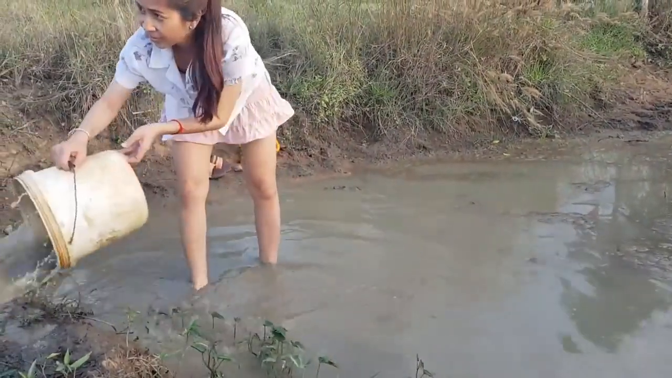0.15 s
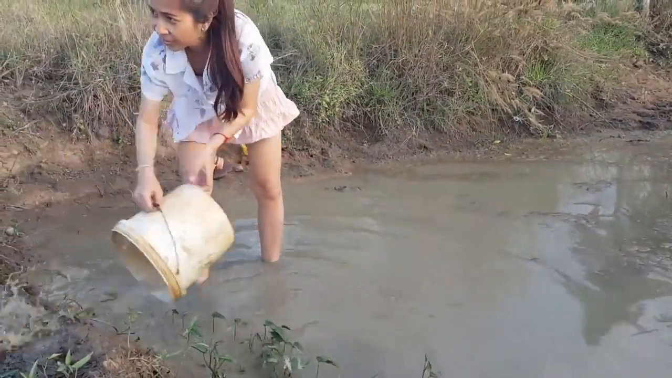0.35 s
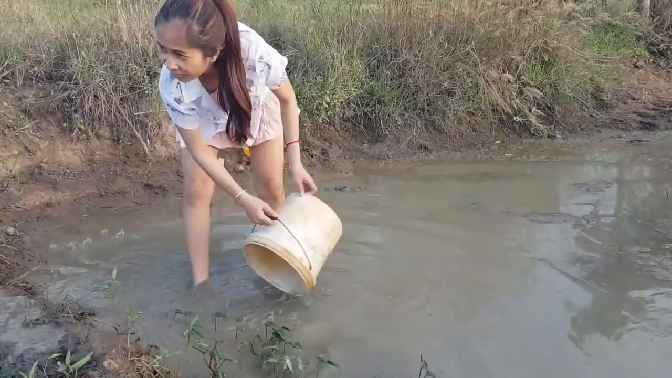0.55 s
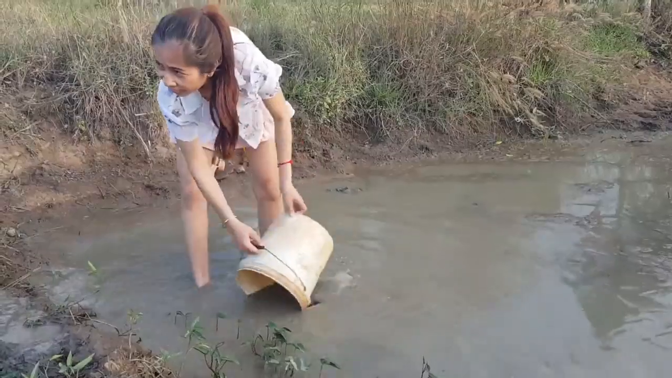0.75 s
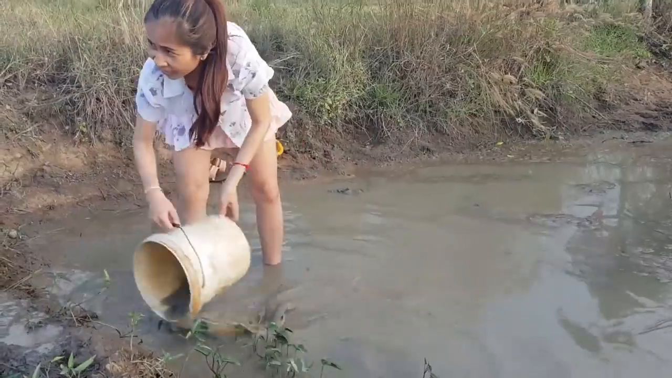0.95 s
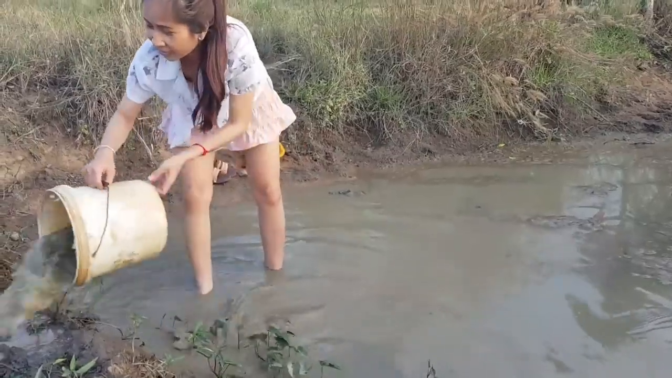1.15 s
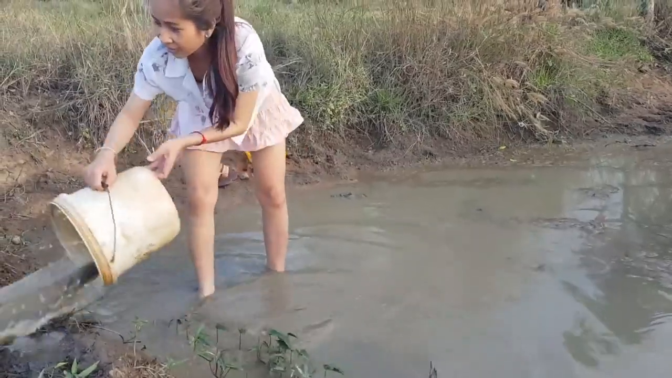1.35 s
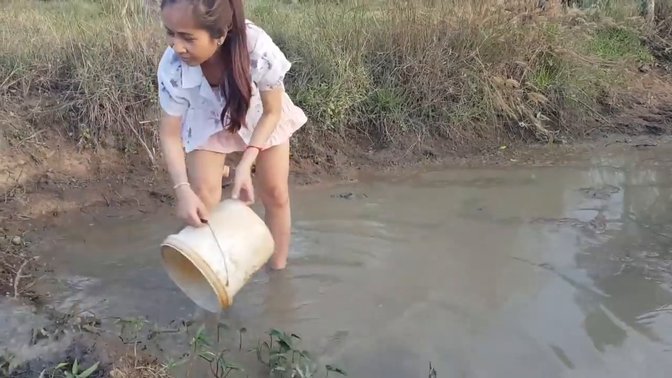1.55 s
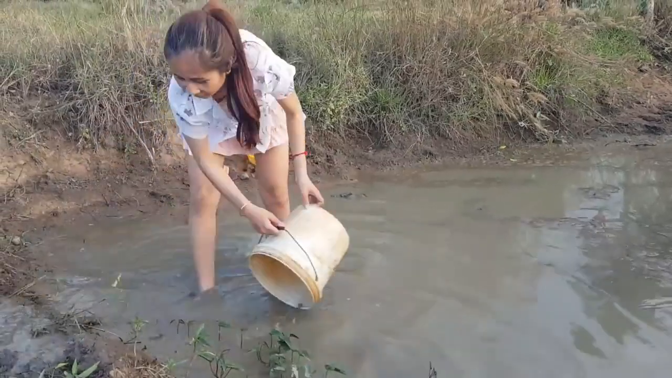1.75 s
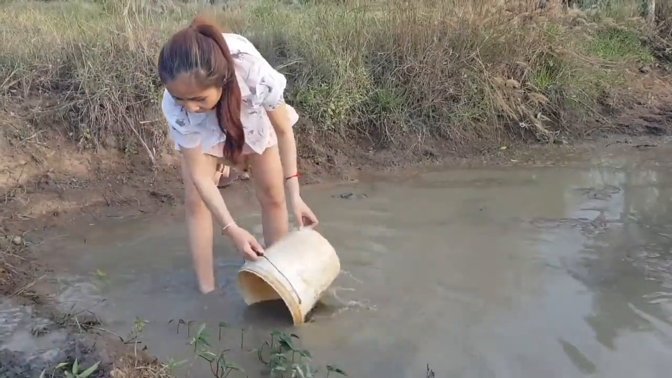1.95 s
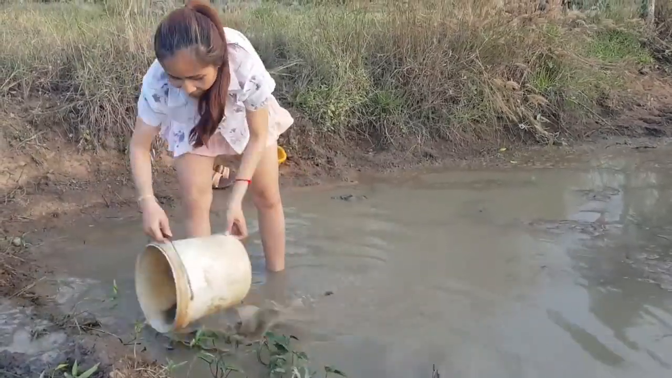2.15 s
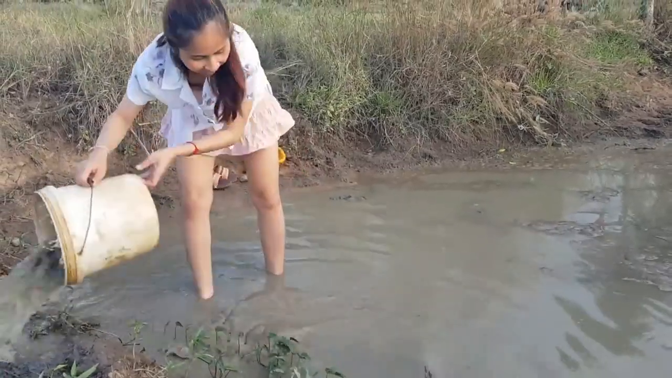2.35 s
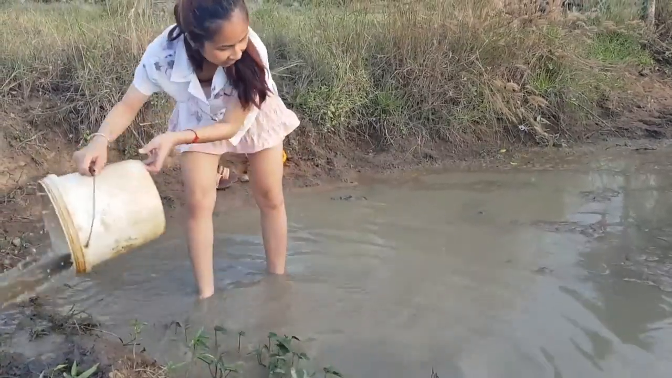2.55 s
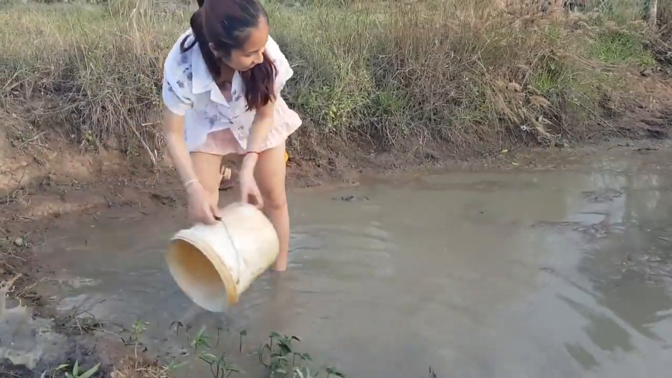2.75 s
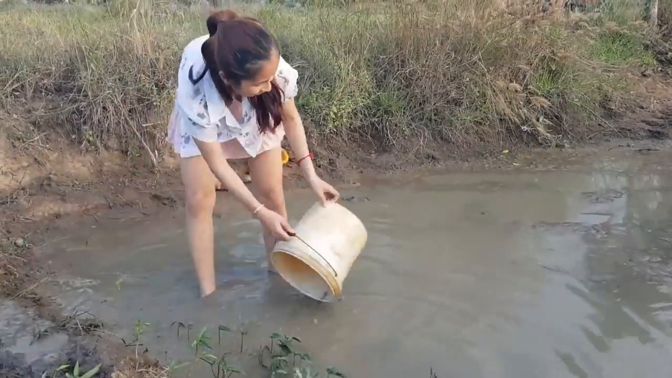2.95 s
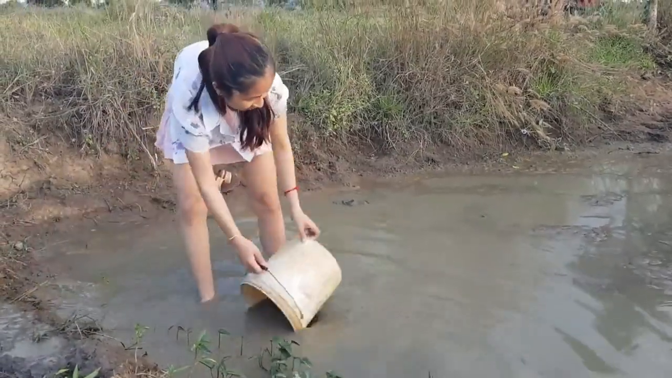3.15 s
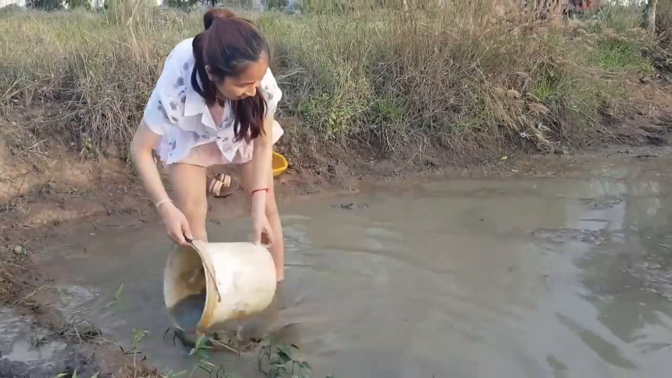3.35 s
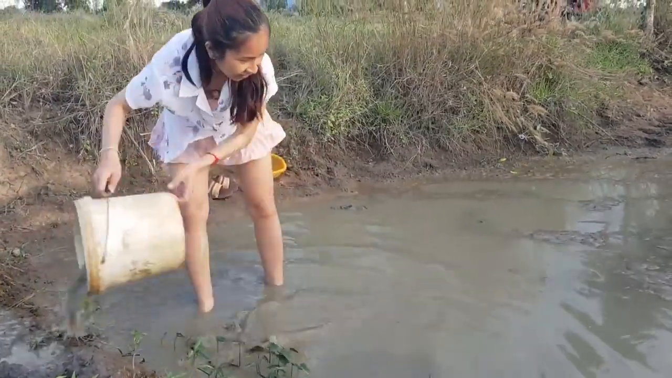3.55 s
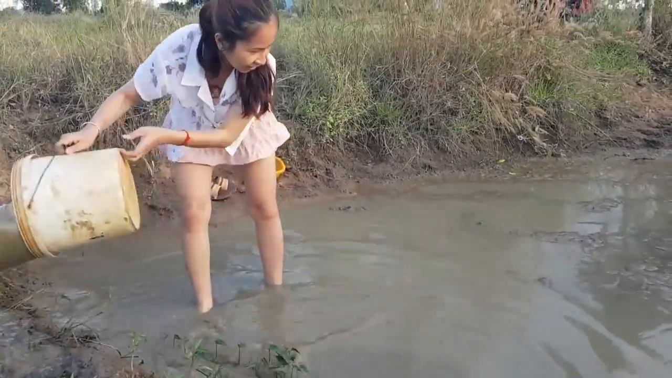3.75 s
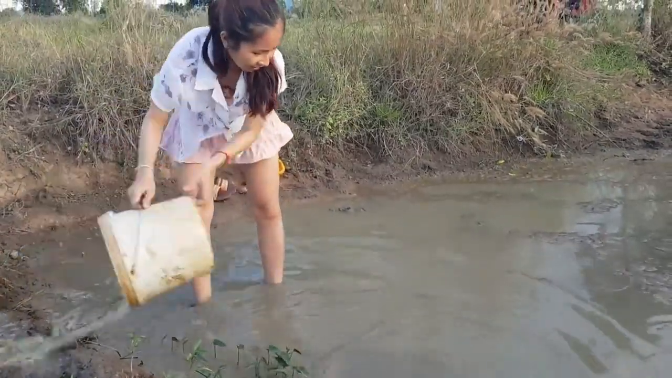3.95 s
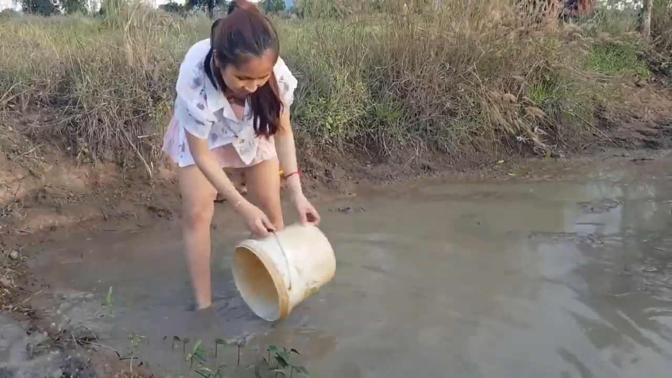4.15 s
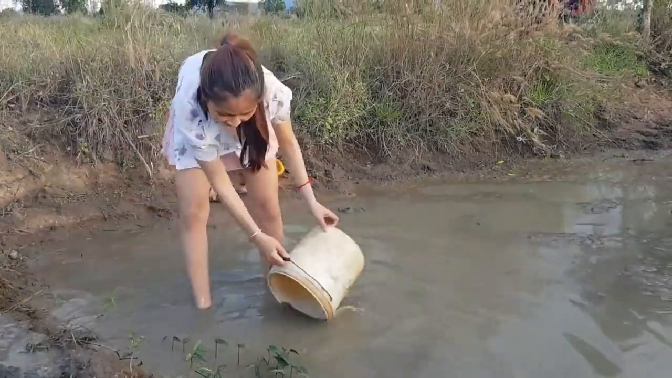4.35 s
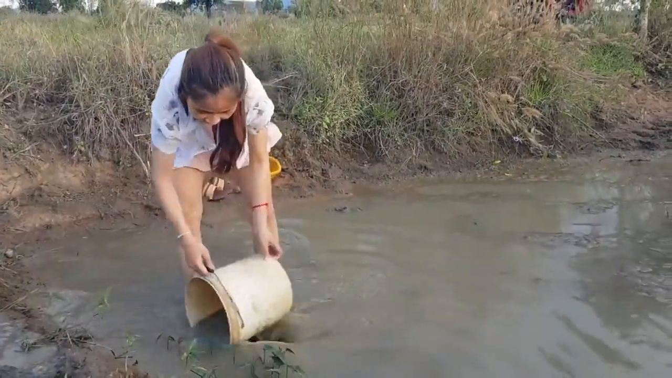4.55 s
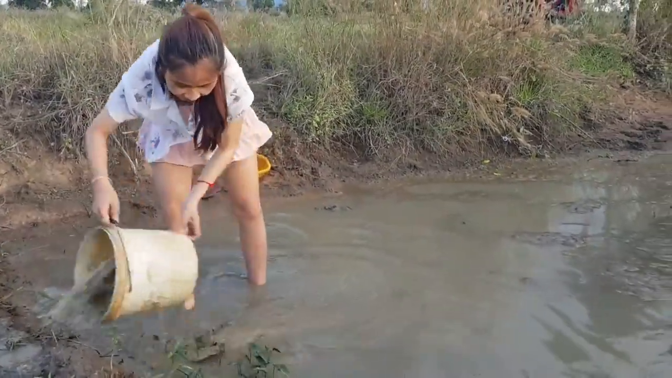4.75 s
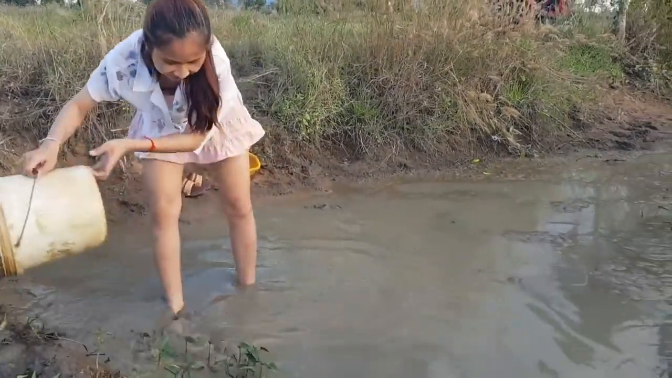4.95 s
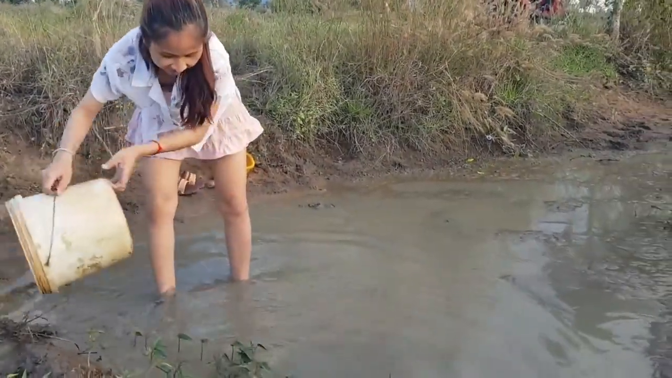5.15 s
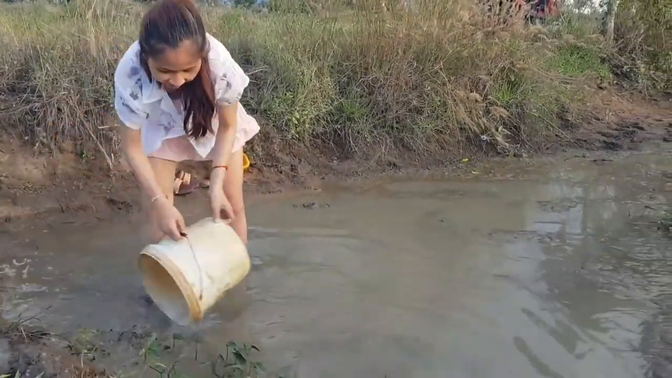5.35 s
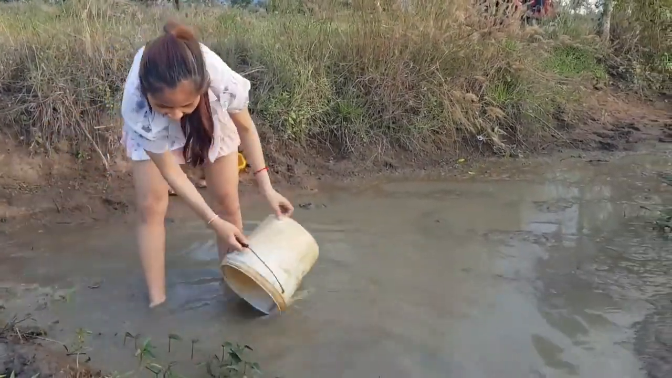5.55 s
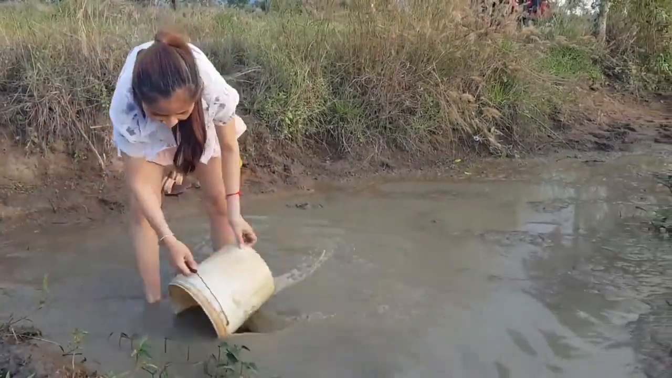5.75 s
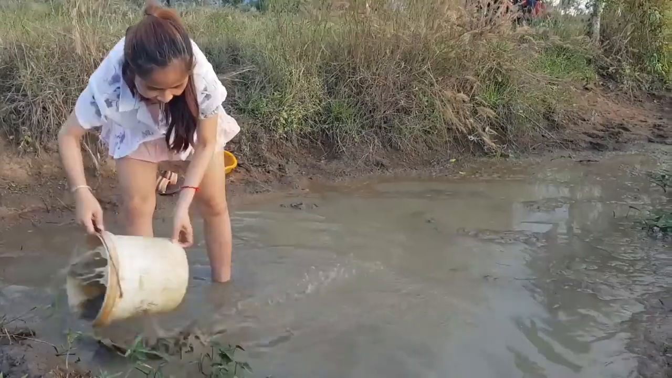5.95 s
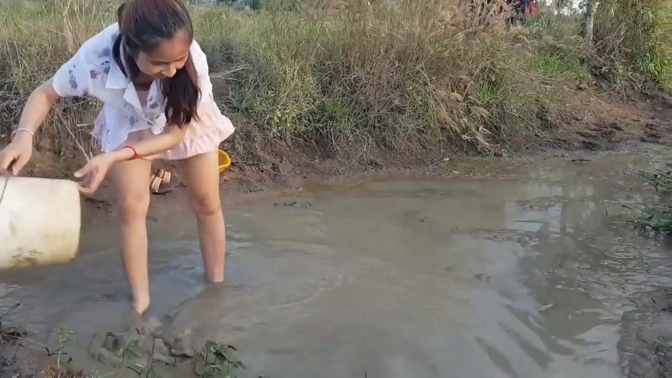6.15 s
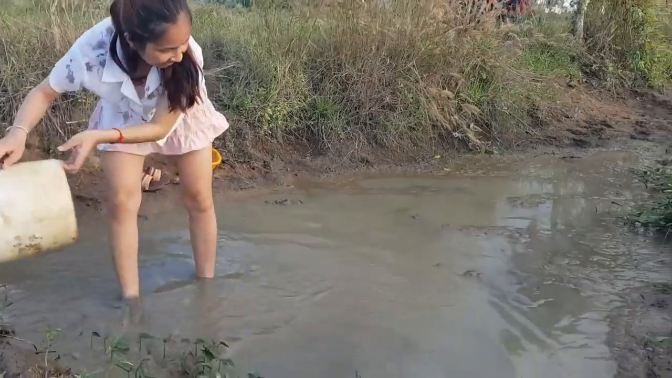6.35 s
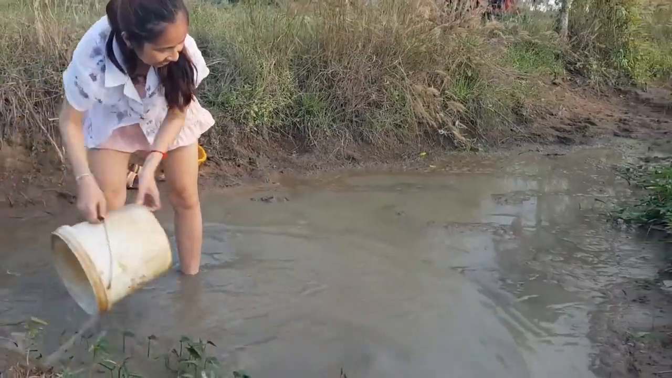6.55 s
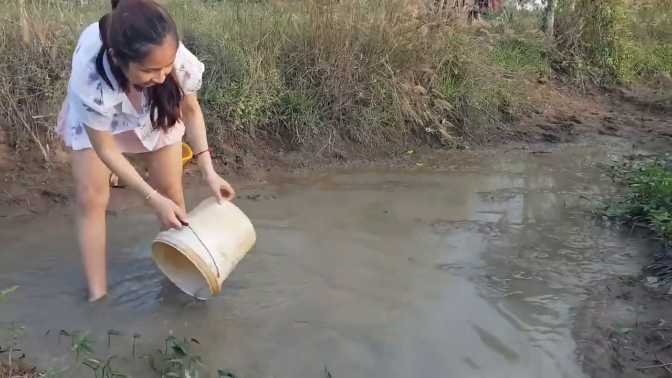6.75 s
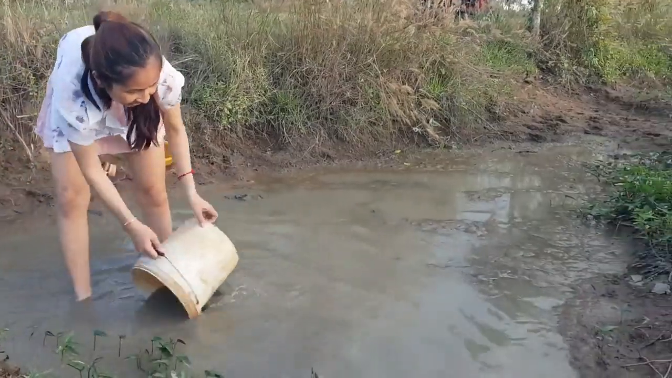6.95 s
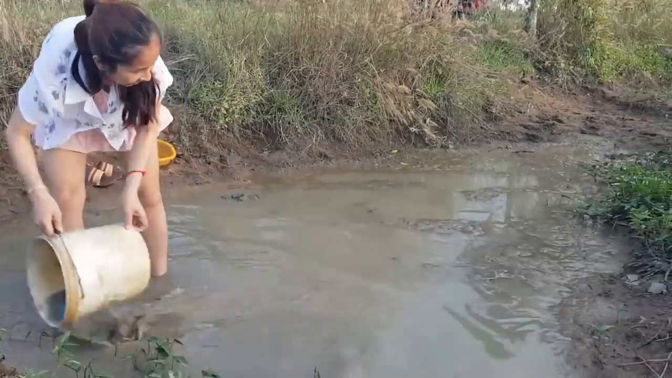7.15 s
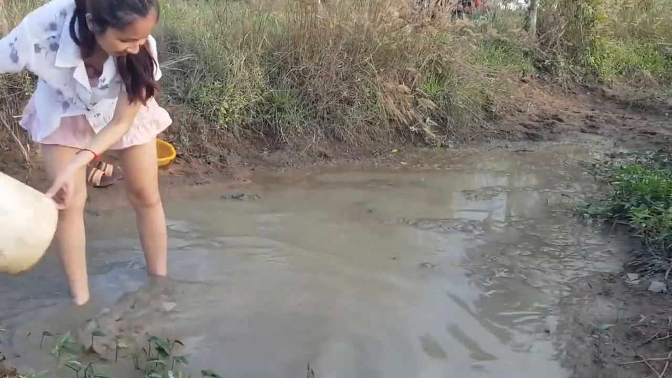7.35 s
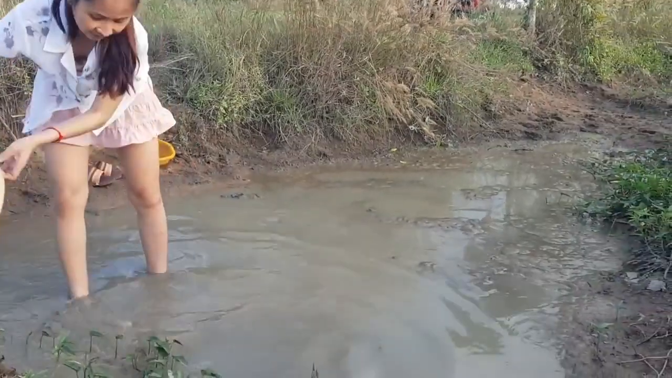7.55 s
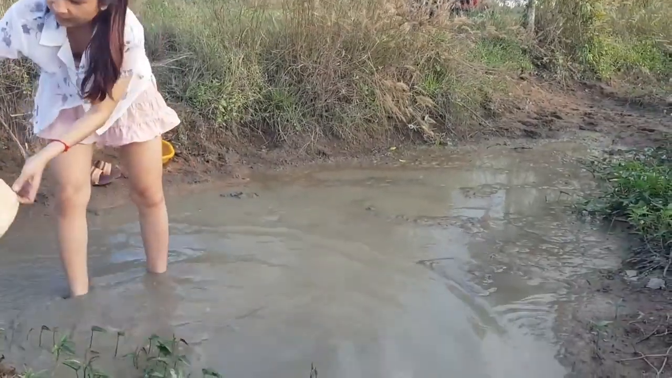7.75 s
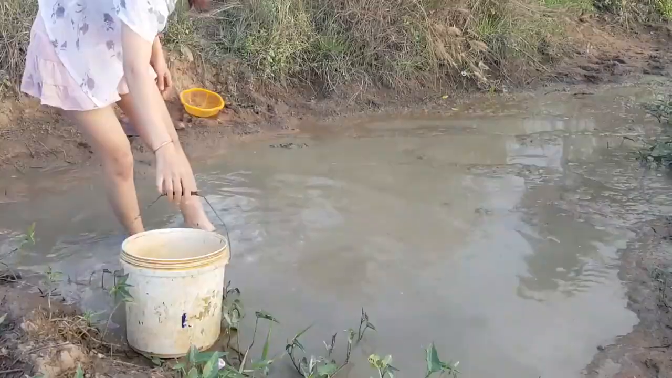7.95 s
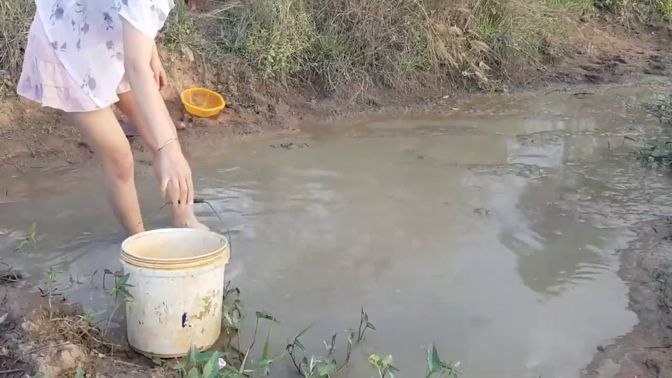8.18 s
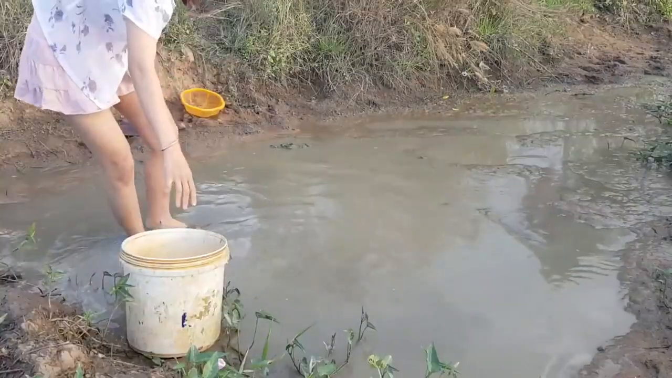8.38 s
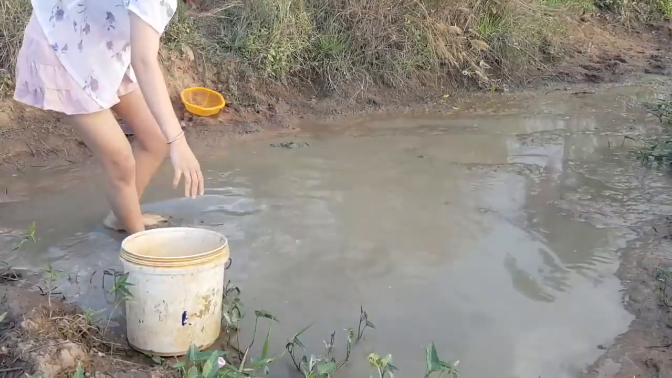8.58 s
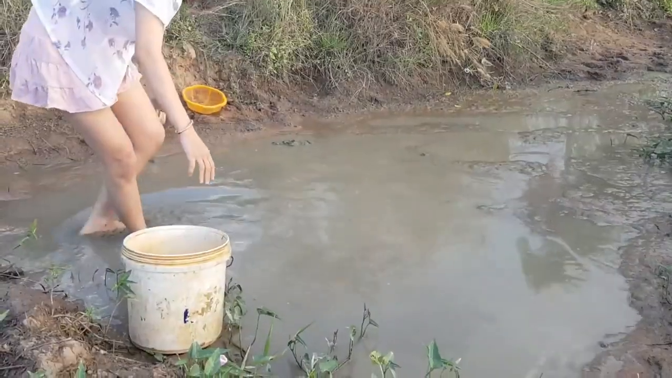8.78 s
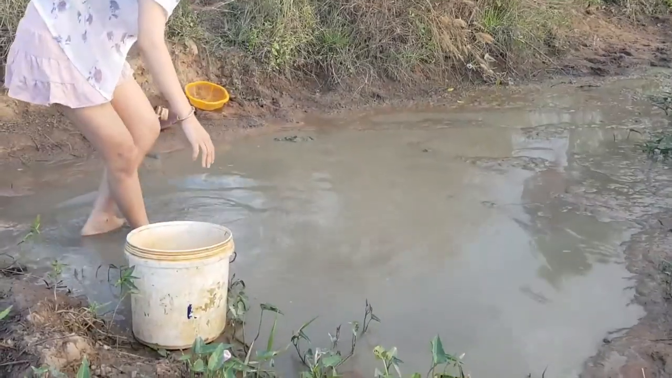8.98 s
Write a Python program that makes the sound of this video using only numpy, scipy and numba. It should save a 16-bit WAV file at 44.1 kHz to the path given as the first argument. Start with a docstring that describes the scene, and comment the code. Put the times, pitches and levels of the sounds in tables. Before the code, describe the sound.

A close, dry outdoor stereo scene with faint wind rumble, distant air and thin high insect hiss. Muddy water is thrown onto a mud bank, slightly left, landing at about 0.4, 1.6, 2.8, 4.1, 5.4, 6.6 and 8.0 seconds. Before each of the first six, a hiss swells for some 0.1 to 0.25 seconds, then a wet, mid-low slap bursts with plops, run-off and a sprinkle of falling drops about 0.3 seconds later. Between throws, from about 1.0, 2.3, 3.3, 4.6, 5.9 and 7.1 seconds, the bucket smacks the water and fills with hollow gurgles and trickles. Throws around 5.4 and 6.6 plop strongest. Wind buffets softly at 7.3 to 8.0; the last splash is short and light, with a dull knock. Tiny drips and faint trickling follow until about 8.8, when a very faint low hum enters over quiet air.

```python
"""Seven bucketfuls of muddy pond water are thrown in turn onto a mud bank on the left, in an open field.
Each sheet hisses, slaps and spatters: clouds of damped bubble sines, coloured and shaped by flow curves.
Scoops gurgle and trickle from longer-ringing bubbles; plops, drips and dull low thuds are placed rings.
Filtered noise gives wind at two microphone ports, distant air and faint insects; a sine hum ends it."""
import sys
import numpy as np
from scipy import signal
from scipy.fft import rfft, irfft, next_fast_len
from scipy.io import wavfile
from scipy.ndimage import uniform_filter1d, map_coordinates
from numba import njit

SR = 44100
rng = np.random.default_rng(int(sys.argv[2]) if len(sys.argv) > 2 else 0)


def materialize(psi):
    """Save the field psi as 16-bit PCM at rate SR to the path in sys.argv[1].

    A 1-D psi becomes a single channel; in a 2-D psi each row is a channel.
    """
    bounded = np.clip(np.atleast_2d(psi).T, -1, 1)
    quanta = np.round(bounded * 32767).astype(np.int16)
    wavfile.write(sys.argv[1], SR, quanta)


N = 397782
TIME = np.arange(N) / SR

# throws of water: landing_s, flight_s (before landing), pour_s, sheet_db, splash_db, weight_db (on the mud),
# runoff_db, spray_delay_s (falling spray after landing), spray_spread_s, spray_db
THROWS = [(0.431, 0.183, 0.014, -30, -28.5, -19.5, -31.5, 0.34, 0.087, -37.5),
          (1.592, 0.12, 0.03, -32, -28, -26, -31.5, 0.31, 0.067, -44),
          (2.83, 0.24, 0.03, -30.5, -27.5, -24.5, -33, 0.31, 0.047, -38.5),
          (4.124, 0.18, 0.059, -29.5, -26.5, -26, -30.5, 0.33, 0.08, -34),
          (5.358, 0.2, 0.042, -30.5, -26, -24, -34.5, 0.31, 0.14, -38.5),
          (6.639, 0.17, 0.041, -31.5, -25, -23, -32.5, 0.31, 0.11, -37.5),
          (7.995, 0.033, 0.045, -30.5, -31.5, -32.5, -33.5, 0.26, 0.049, -36)]
# scoops, and a last wading step: start_s, length_s, gurgle_db, trickle_db, settling_db_per_s (negative swells)
SCOOPS = [(0.0, 0.23, -48.5, -57, -9), (0.965, 0.48, -45.5, -49.5, 12.5), (2.275, 0.27, -46, -48, 13),
          (3.316, 0.52, -41, -46.5, 13), (4.61, 0.52, -45.5, -45.5, 5.5), (5.929, 0.46, -43, -48.5, 11.5),
          (7.098, 0.56, -43, -53.5, 22.5), (8.379, 0.38, -79, -57, 15)]
# plops of single air pockets, large and small, closing in the water: start_s, level_db, pitch_hz, decay_cycles
PLOPS = [(0.222, -37, 444, 4.7), (0.43, -8, 580, 1.3), (0.524, -21.5, 540, 1.3), (0.756, -24, 1155, 5),
         (0.992, -15.5, 824, 1.98), (1.086, -14, 2110, 3.5), (1.129, -26.5, 940, 4.6),
         (1.344, -36, 370, 1.3), (1.415, -25.5, 1100, 2.1), (1.6, -21, 304, 0.9), (1.604, -11, 651, 5),
         (1.681, -18, 646, 1.8), (2.308, -23.5, 1180, 5), (2.356, -32, 810, 2.8), (2.728, -26, 473, 1.6),
         (2.812, -17.5, 1060, 3.4), (2.918, -21, 526, 2.3), (3.29, -26, 580, 1.1), (3.309, -28, 645, 5.3),
         (3.371, -20, 2150, 2.6), (3.435, -19, 2490, 4.5), (3.455, -28, 478, 3.6), (3.485, -23, 664, 2.9),
         (3.77, -36, 460, 2.9), (4.051, -24, 478, 2.8), (4.743, -15.5, 915, 0.89), (4.783, -24, 590, 1.8),
         (4.975, -37, 407, 6), (5.09, -32.5, 442, 2.1), (5.16, -37.5, 670, 7.8), (5.323, -24, 420, 1.5),
         (5.344, -9, 640, 2.4), (5.385, -6.5, 620, 2), (5.82, -29.5, 328, 0.98), (6.191, -27, 1600, 4.9),
         (6.25, -44, 621, 11.4), (6.599, -15, 1010, 2.4), (6.63, -9.5, 638, 1.8), (6.65, -3.5, 500, 0.85),
         (6.676, -14.5, 480, 2.6), (6.815, -33, 450, 7.3), (7.033, -21, 1920, 3.1), (7.189, -28, 606, 3.4),
         (7.253, -31, 580, 2.8), (7.285, -33, 1000, 7), (7.338, -30.5, 950, 2.5), (8.019, -18, 600, 1.6),
         (8.223, -32.5, 483, 3.4)]
# short smacks of water on bucket and pond: start_s, spray_db, slosh_db
SMACKS = [(0.008, -54, -37.5), (0.243, -34, -62), (0.695, -28.5, -38), (0.807, -24.5, -60),
          (0.99, -30.5, -38), (1.366, -32, -37.5), (1.465, -28.5, -62), (2.1774, -27.5, -33),
          (2.254, -31, -43), (2.305, -51, -32.5), (2.458, -37, -62), (2.5132, -29.5, -57),
          (3.3353, -31, -29), (3.369, -27.5, -30.5), (3.82, -32, -59), (4.546, -30, -37.5),
          (4.652, -28, -34), (4.927, -31, -60), (5.104, -47, -40), (5.621, -22, -48), (5.927, -23.5, -24.5),
          (6.47, -35, -60), (7.165, -32, -31), (7.4265, -33, -52), (7.489, -37, -50), (7.6635, -38, -65),
          (7.903, -38, -77), (7.955, -30, -60), (7.993, -18, -43)]
# dull low thuds of water on mud and knocks of the bucket: start_s, level_db, pitch_hz
LOW_THUDS = [(0.43, -32, 168), (1.599, -36, 200), (2.532, -29.5, 116), (2.638, -28.5, 96), (3.343, -33, 75),
             (5.406, -22, 131), (6.468, -27, 101), (6.653, -34, 148), (7.954, -27.5, 118)]
# single drips: start_s, level_db, pitch_hz
DRIPS = [(0.32, -16, 4030), (2.457, -22, 4000), (3.563, -25.5, 2590), (4.6518, -15.5, 3700),
         (4.818, -26, 1980), (7.6216, -32, 2120), (7.6664, -27.5, 3090), (7.7253, -44, 1550),
         (7.895, -39, 2600), (8.3807, -35, 2460), (8.4546, -33, 5100), (8.4956, -36.5, 1980),
         (8.5375, -38, 2330), (8.6158, -37, 5300), (8.7154, -45, 2370)]
# wind gusts on the ports: start_s, length_s, level_db
GUSTS = [(7.34, 0.063, -38.5), (7.55, 0.46, -37)]

# colour of fine flying drops: frequency_hz, gain_db
SPRAY_COLOUR = [(300, -25), (800, -3), (1500, -0.5), (2300, 3), (3200, -2.5), (4600, 0), (5600, -3.5),
                (6500, -10.5), (7700, -7.5), (9500, -10), (11200, -9.5), (16000, -16)]
# colour of the air pockets in landing water: frequency_hz, gain_db
SLOSH_COLOUR = [(90, -32), (200, -13.5), (330, -11.5), (460, -0.5), (660, 4.5), (850, -4), (1080, 3),
                (1500, -15), (2500, -11)]
# colour of the heavy thud on mud: frequency_hz, gain_db
THUD_COLOUR = [(70, -15.5), (130, -4), (200, -5.5), (270, -0.5), (380, 0.5), (600, -16)]
# colour of the bubbles of a filling bucket: frequency_hz, gain_db
GURGLE_COLOUR = [(250, -65), (400, -11.5), (520, -6.5), (650, -1), (830, -4), (1030, 3.5), (1500, -7.5),
                 (2200, -4.5), (3200, -36), (5000, -3.5)]
# colour of water trickling off the rim: frequency_hz, gain_db
TRICKLE_COLOUR = [(800, 24), (2200, -2.5), (3200, -1), (4400, 2), (5400, -2.5), (6400, -5.5), (7600, -0.5),
                  (9200, -8.5), (11200, -5.5), (16000, -12.5)]
# extra colour of drops bursting into mist: frequency_hz, gain_db
MIST_COLOUR = [(2500, -30), (6000, -13), (9000, -15.5), (12000, -16), (16000, -9.5)]
# the airborne sheet lacks body: frequency_hz, gain_db
SHEET_THINNING = [(500, -14), (1200, -2.5), (2500, -3.5), (5000, 1.5), (16000, 0)]
# colour of gusts on a port: frequency_hz, gain_db
BUFFET_COLOUR = [(15, -14.5), (40, -5.5), (70, 0), (115, -2.5), (170, -12.5), (260, -21), (450, -46),
                 (1500, -66), (5000, -90)]
# colour of the steady outdoor rumble: frequency_hz, gain_db
RUMBLE_COLOUR = [(15, -36.5), (40, -18.5), (62, -9.5), (80, 2), (105, -9.5), (160, -8), (240, -21),
                 (450, -36), (1500, -76), (5000, -88.5)]
# colour of the distant air: frequency_hz, gain_db
FIELD_COLOUR = [(60, 12), (200, -8.5), (400, -15), (650, -12.5), (950, -2.5), (1700, -9.5), (3000, -17.5),
                (6000, -22.5), (16000, -15)]
# resonant bands of insect song: centre_hz, width_hz, level_db
INSECTS = [(7660, 450, -4), (7850, 870, -1.5), (11000, 780, -9)]
# left port above right port for all the water: frequency_hz, difference_db
LEFT_LEAD = [(100, -0.5), (500, 2), (1100, 1.5), (2200, 3.5), (4500, 3.5), (7800, 3), (11000, 1.5)]
# treble-heavy colour of the diffuse tail: frequency_hz, gain_db
TAIL_COLOUR = [(500, -4), (1500, 2.5), (4000, 7)]

BANK_LAG_S, POND_LAG_S = 0.00031, 0.00014  # how much sooner the left port hears each place
SHEET_SWELL_DB_PER_S, SHEET_ATTACK_S = 45.5, 0.013  # the sheet hisses louder as it spreads and tears
FIRST_LUMPS_DB, LUMPS_SWELL_DB_PER_S = -3.5, 141  # relative to the sheet; they land ahead of the bulk
SPLASH_ATTACK_S, SPLASH_RELEASE_S = 0.018, 0.026
WEIGHT_ATTACK_S, WEIGHT_RELEASE_S = 0.008, 0.023
RUNOFF_S, RUNOFF_RELEASE_S, RUNOFF_FADE_DB_PER_S = 0.23, 0.042, 50  # water runs back down the bank
FIZZ_DB, FIZZ_FADE_DB_PER_S = -7, 7.5  # fine drops, relative to the run-off
FALLING_WEIGHT_DB = -10.5  # heavy drops relative to the falling spray
SMACK_ATTACK_S, SMACK_DECAY_S, SMACK_SLOSH_DECAY_S = 0.0013, 0.01, 0.011
SCOOP_ATTACK_S, SCOOP_RELEASE_S = 0.028, 0.0098
GULP_DB, GULPS_PER_S = 1, 20  # uneven inflow: rms swing and rate
LAPPING_DB, LAPPING_END_S, LAPPING_RELEASE_S = -53.5, 7.43, 0.35  # the stirred pond keeps trickling
LAPPING_GURGLE_DB = -7  # its gurgle relative to its trickle
BREEZE_DB, CALM_DB, BREEZE_END_S, BREEZE_RELEASE_S = -51.5, -66.5, 7.85, 0.28  # rumble falls away
GUST_ATTACK_S, GUST_RELEASE_S, GUST_FADE_DB_PER_S = 0.061, 0.035, 27.5
HUM_START_S, HUM_HZ, HUM_DB = 8.76, 149.4, -60
EDGE_HZ = 15950


def throws(hard_db=-23, mist_db=-9):
    """Fragmentation and entrainment: a sheet tears into drops; its bulk traps big, damped pockets in mud."""
    drops = cloud(count=45000, lo_hz=895, hi_hz=16100, cycles=1.17, rise=0.019, spread_db=2.5,
                  cluster_db=1.5, lag=BANK_LAG_S, lag_spread=0.00007, colour=SPRAY_COLOUR)
    spatter = sprinkle(count=900, lo_hz=982, hi_hz=6010, cycles=5, rise=0.02, spread_db=16, lag=BANK_LAG_S)
    pockets = cloud(count=6000, lo_hz=130, hi_hz=2144, cycles=2.6, rise=0.087, spread_db=2.5,
                    cluster_db=-0.5, lag=BANK_LAG_S, lag_spread=0.0001, colour=SLOSH_COLOUR)
    thud = cloud(count=2000, lo_hz=100, hi_hz=462, cycles=1.07, rise=0.02, spread_db=-5,
                 cluster_db=5.5, lag=BANK_LAG_S, lag_spread=0.00005, colour=THUD_COLOUR)
    flying, fine, heavy = together(throw_flow(*row) for row in THROWS)
    # only the full weight of the water thuds and bursts into mist
    hardness = np.minimum(heavy / gain_of(hard_db), 1)
    clumps = gain_of(1.2 * wander(per_s=130))
    spray = gain_of(-0.5) * drops * clumps + gain_of(14) * spatter
    mist = gain_of(mist_db) * hardness * evened(coloured(drops, MIST_COLOUR))
    # half a turn in time gives the sheet other drops of the same kind
    sheet = coloured(np.roll(spray, N // 2, axis=1), SHEET_THINNING)
    impact = pockets + gain_of(-9) * hardness * thud
    return flying * sheet + fine * (spray + mist) + heavy * impact


def throw_flow(landing, flight, pour, sheet_db, splash_db, weight_db, runoff_db,
               fall_delay, fall_spread, fall_db):
    """Ballistic sequence: amounts of airborne, fine and heavy water in flight, landing, run-off and fallback."""
    launch, runoff_start = landing - flight, landing + pour
    # both swells reach their stated level on landing
    sheet = gain_of(sheet_db - SHEET_SWELL_DB_PER_S * flight) * envelope(
        launch, flight, SHEET_ATTACK_S, SPLASH_RELEASE_S, SHEET_SWELL_DB_PER_S)
    lumps = gain_of(sheet_db + FIRST_LUMPS_DB - LUMPS_SWELL_DB_PER_S * flight) * envelope(
        launch, flight, WEIGHT_ATTACK_S, WEIGHT_RELEASE_S, LUMPS_SWELL_DB_PER_S)
    splash = gain_of(splash_db) * envelope(landing, pour, SPLASH_ATTACK_S, SPLASH_RELEASE_S)
    weight = gain_of(weight_db) * envelope(landing, pour, WEIGHT_ATTACK_S, WEIGHT_RELEASE_S)
    runoff = gain_of(runoff_db) * envelope(
        runoff_start, RUNOFF_S, SPLASH_ATTACK_S, RUNOFF_RELEASE_S, -RUNOFF_FADE_DB_PER_S)
    fizz = gain_of(runoff_db + FIZZ_DB) * envelope(
        runoff_start, RUNOFF_S, SPLASH_ATTACK_S, RUNOFF_RELEASE_S, -FIZZ_FADE_DB_PER_S)
    falling = gain_of(fall_db) * np.exp(-0.5 * ((TIME - landing - fall_delay) / fall_spread) ** 2)
    fine = together([splash, fizz, falling])
    heavy = together([lumps, weight, runoff, gain_of(FALLING_WEIGHT_DB) * falling])
    return np.array([sheet, fine, heavy])


def plops(rise=0.026):
    """Bubble resonance: single air pockets, large and small, ring as they close in the water, gliding up."""
    start, db, hz, cycles = np.array(PLOPS, float).T
    same = np.ones(len(start))
    cycles = np.clip(cycles, 0.5, 12)
    return ring(start, gain_of(db + 0.5), hz, cycles, rise * same, 0.00011 * same, N, SR)


def smacks(drops_db=-6, bubbles_db=-1):
    """Impact: each smack is a tight burst of drops and a slightly longer slosh of bubbles."""
    burst = together(gain_of(db) * envelope(s + SMACK_ATTACK_S, 0, SMACK_ATTACK_S, SMACK_DECAY_S)
                     for s, db, _ in SMACKS)
    slosh = together(gain_of(db) * envelope(s + SMACK_ATTACK_S, 0, SMACK_ATTACK_S, SMACK_SLOSH_DECAY_S)
                     for s, _, db in SMACKS)
    drops = cloud(count=30000, lo_hz=716, hi_hz=16400, cycles=1.6, rise=0.016, spread_db=-2,
                  cluster_db=-1.5, lag=POND_LAG_S, lag_spread=0.0001, colour=SPRAY_COLOUR)
    bubbles = cloud(count=7000, lo_hz=420, hi_hz=2810, cycles=1.9, rise=0.063, spread_db=5,
                    cluster_db=13.5, lag=POND_LAG_S, lag_spread=0.0001, colour=GURGLE_COLOUR)
    return gain_of(drops_db) * drops * burst + gain_of(bubbles_db) * bubbles * slosh


def scoops():
    """Air entrainment: inflowing water folds in dull bubbles and a few rising ones, and trickles off the rim."""
    bubbles = cloud(count=5000, lo_hz=278.5, hi_hz=3785, cycles=2.68, rise=0.042, spread_db=3,
                    cluster_db=1, lag=POND_LAG_S, lag_spread=0.00019, colour=GURGLE_COLOUR)
    rising = sprinkle(count=220, lo_hz=427, hi_hz=2280, cycles=11, rise=0.1, spread_db=9.5, lag=POND_LAG_S)
    trickle = cloud(count=26000, lo_hz=1440, hi_hz=17400, cycles=3.12, rise=0.051, spread_db=2.5,
                    cluster_db=0.5, lag=POND_LAG_S, lag_spread=0.000195, colour=TRICKLE_COLOUR)
    droplets = sprinkle(count=380, lo_hz=1830, hi_hz=6000, cycles=18, rise=0.0059, spread_db=-1,
                        lag=POND_LAG_S)
    gurgle = gain_of(-1) * bubbles + gain_of(6) * rising
    runnels = gain_of(1.5) * trickle + gain_of(4.5) * droplets
    filling, dripping = together(scoop_flow(*row) for row in SCOOPS)
    lapping = gain_of(LAPPING_DB) * envelope(0, LAPPING_END_S, SCOOP_ATTACK_S, LAPPING_RELEASE_S)
    inflow = together([filling, gain_of(LAPPING_GURGLE_DB) * lapping])
    gulps = inflow * gain_of(GULP_DB * wander(per_s=GULPS_PER_S))
    return (gurgle + glugs()) * gulps + runnels * together([dripping, lapping])


def scoop_flow(start, length, gurgle_db, trickle_db, settling_db):
    """Flow decay: amounts of gurgle and trickle in one scoop, settling (or swelling) at a steady dB rate."""
    levels = gain_of([[gurgle_db], [trickle_db]])
    return levels * envelope(start, length, SCOOP_ATTACK_S, SCOOP_RELEASE_S, -settling_db)


def glugs():
    """Bubble glide: scattered larger bubbles ring on and slide clearly upward as they surface."""
    return gain_of(9) * sprinkle(count=70, lo_hz=520, hi_hz=1900, cycles=10, rise=0.1, spread_db=4.5,
                                 lag=POND_LAG_S)


def drips(cycles=7, rise=0.012):
    """Drop entrainment: single drops fall in the pond and trap small, high bubbles."""
    start, db, hz = np.array(DRIPS, float).T
    same = np.ones(len(start))
    return ring(start, gain_of(db), hz, cycles * same, rise * same, POND_LAG_S * same, N, SR)


def low_thuds():
    """Heavily damped resonance: water on mud or a knock of the bucket gives a low push of a cycle or two."""
    start, db, hz = np.array(LOW_THUDS, float).T
    same = np.ones(len(start))
    return ring(start, gain_of(db + 4), hz, 0.43 * same, 0 * same, POND_LAG_S * same, N, SR)


def wind(left_db=4, right_db=-2, shared=3.2):
    """Turbulence: low rumble is largely common to both ports; gusts buffet each separately, the left harder."""
    left, right, both = coloured(rng.standard_normal((3, N)), RUMBLE_COLOUR)
    fading = gain_of(BREEZE_DB) * envelope(0, BREEZE_END_S, GUST_ATTACK_S, BREEZE_RELEASE_S)
    breeze = together([fading, gain_of(CALM_DB)])
    rumble = evened(np.array([left, right]) + shared * both) * breeze
    force = together(gain_of(db) * envelope(s, length, GUST_ATTACK_S, GUST_RELEASE_S, -GUST_FADE_DB_PER_S)
                     for s, length, db in GUSTS)
    buffet = evened(coloured(rng.standard_normal((2, N)), BUFFET_COLOUR))
    gust = buffet * force * gain_of(0.84 * wander(per_s=21))
    return rumble + gust * gain_of([[left_db], [right_db]])


def field():
    """Band-shaped noise: distant air and narrow insect bands, with a faint low sine hum at the end."""
    air = gain_of(-62) * evened(coloured(rng.standard_normal((2, N)), FIELD_COLOUR))
    hz = np.fft.rfftfreq(N, 1 / SR)
    song = sum(gain_of(db) / (1 + ((hz - centre) / width) ** 2) ** 2 for centre, width, db in INSECTS)
    insects = gain_of(-63) * evened(irfft(rfft(rng.standard_normal((2, N))) * song, N))
    onset = np.clip((TIME - HUM_START_S) / 0.0193, 0, 1)
    hum = gain_of(HUM_DB) * np.sin(2 * np.pi * HUM_HZ * TIME) * onset
    return air + insects * gain_of(1.5 * wander(per_s=25)) + hum


def cloud(count, lo_hz, hi_hz, cycles, rise, spread_db, cluster_db, lag, lag_spread, colour):
    """Superposition: countless drops or bubbles of mixed sizes and places, at a nearly even overall flow."""
    when, pitch, big, life, glide, place = rng.random((count, 6)).T
    hz = lo_hz * (hi_hz / lo_hz) ** pitch
    # levels cluster over some 20 ms and an eighth of the pitch range
    cluster = map_coordinates(rng.standard_normal((451, 9)), [450 * when, 8 * pitch], order=1)
    size = hz * gain_of(spread_db * np.minimum(-np.log(1 - big), 4) + cluster_db * cluster)
    lags = lag + lag_spread * (2 * place - 1)
    x = ring(when * N / SR, size, hz, cycles * (0.5 + life), 2 * rise * glide, lags, N, SR)
    x = coloured(x, colour)
    flow = uniform_filter1d((x ** 2).mean(0), size=1100)
    flow = uniform_filter1d(flow, size=1100)
    return x / np.sqrt(abs(flow) + 0.024 * flow.mean())


def sprinkle(count, lo_hz, hi_hz, cycles, rise, spread_db, lag):
    """Superposition: scattered drops and bubbles of random size, pitch and time, often overlapping."""
    when, pitch, big, life, place = rng.random((count, 5)).T
    size = gain_of(spread_db * (big ** 3 - 1))
    hz = lo_hz * (hi_hz / lo_hz) ** pitch
    vary = 0.5 + place
    return ring(when * N / SR, size, hz, cycles * (0.5 + life), rise * vary, lag * vary, N, SR)


@njit
def ring(start, size, hz, cycles, rise, lag, length, sr):
    """Damped oscillation at two ports: each sine swells as its bubble's neck closes, dies and glides by rise."""
    out = np.zeros((2, length))
    for k in range(len(start)):
        life = cycles[k] / hz[k]
        for port in range(2):
            begin = start[k] + port * lag[k]
            first = max(0, int(begin * sr) + 1)
            last = min(length, int((begin + 6 * life) * sr))
            for i in range(first, last):
                t = i / sr - begin
                swell = 1.3 * (1 - np.exp(-(2.2 * t / life) ** 1.5)) * np.exp(-t / life)
                turns = hz[k] * t * (1 + rise[k] * t / (2 * life))
                out[port, i] += size[k] * swell * np.sin(2 * np.pi * turns)
    return out


def scatter(x, wet_db, t60):
    """Diffuse scattering: banks, grass and moving bucket return a short, ever-changing, mostly treble tail."""
    hz, _, z = signal.stft(x, SR, nperseg=256, noverlap=192)
    keep = gain_of(-120 * 64 / SR / t60)  # power kept per 64-sample hop: 60 dB lost in t60 seconds
    power = signal.lfilter([0, 0, 1 - keep], [1, -keep], abs(z) ** 2)
    z = np.sqrt(power) * np.exp(2j * np.pi * rng.random(z.shape))
    z *= gain_of(wet_db + read(TAIL_COLOUR, hz))[:, None]
    return x + 2 * signal.istft(z, nperseg=256, noverlap=192)[1][:, :N]


def envelope(start, length, attack, release, slope_db=0):
    """Growth and decay: rises into start, drifts by slope_db a second for length, then dies away."""
    t = TIME - start
    rising = (np.minimum(t, 0) / max(attack, 0.0003)) ** 2
    dying = np.maximum(t - length, 0) / max(release, 0.001)
    return np.exp(-np.minimum(rising + dying, 40)) * gain_of(slope_db * np.clip(t, 0, length))


def together(parts):
    """Incoherent addition: amplitudes of unrelated sounds add as powers."""
    return np.sqrt(sum(part ** 2 for part in parts))


def wander(per_s):
    """Random modulation: a smooth curve of about rms 1 from averaged noise."""
    knots = np.linspace(0, N / SR, 4000)
    span = max(1, int(1 / (knots[1] * per_s)))
    smooth = uniform_filter1d(rng.standard_normal(len(knots)), span)
    return np.interp(TIME, knots, evened(smooth))


def coloured(x, points):
    """Spectral shaping: multiplies the spectrum by a colour table."""
    size = next_fast_len(x.shape[-1] + 2048)
    gain = gain_of(read(points, np.fft.rfftfreq(size, 1 / SR)))
    return irfft(rfft(x, size) * gain, size)[..., :x.shape[-1]]


def read(points, hz):
    """Logarithmic pitch scale: interpolates a colour table over log frequency."""
    f, value = np.transpose(points)
    return np.interp(np.log(hz + 1), np.log(f), value)


def evened(x):
    """Power normalization: scales to rms 1."""
    return x / np.sqrt(np.mean(x ** 2) + 1e-20)


def gain_of(db):
    """Level scale: decibels to amplitude."""
    return 10 ** (np.asarray(db) / 20)


def scene():
    """Acoustic shadow: all the water lies to the left, so the body holding the ports shades the right one."""
    flows = scatter(throws() + smacks() + scoops(), wet_db=-5.5, t60=0.069)
    plops_and_drips = scatter(plops() + drips(), wet_db=-9, t60=0.07)
    water = flows + plops_and_drips
    left = coloured(water[0], [(f, db / 2) for f, db in LEFT_LEAD])
    right = coloured(water[1], [(f, -db / 2) for f, db in LEFT_LEAD])
    return np.array([left, right]) + low_thuds() + wind() + field()


def record(dry):
    """Band limitation: a steep linear-phase low-pass removes the extreme treble."""
    low_pass = signal.firwin(611, EDGE_HZ, window=("kaiser", 9), fs=SR)
    return signal.oaconvolve(dry, low_pass[None], "same")


dry = scene()
out = record(dry)
materialize(out)
```